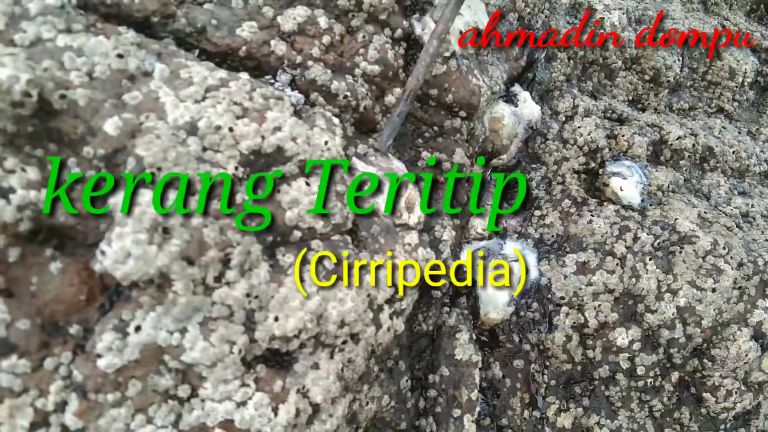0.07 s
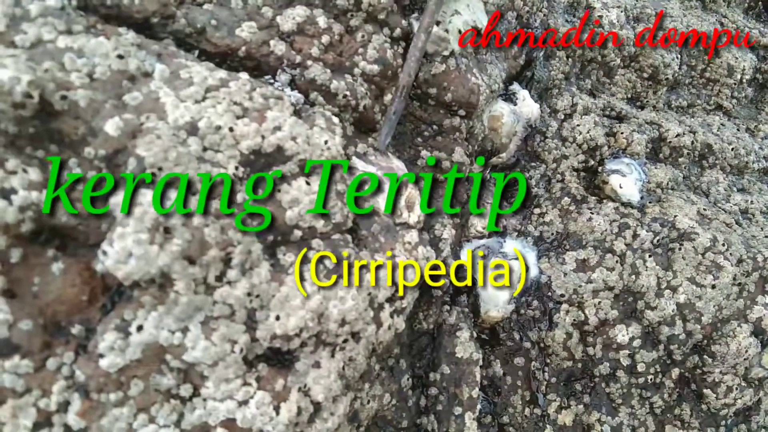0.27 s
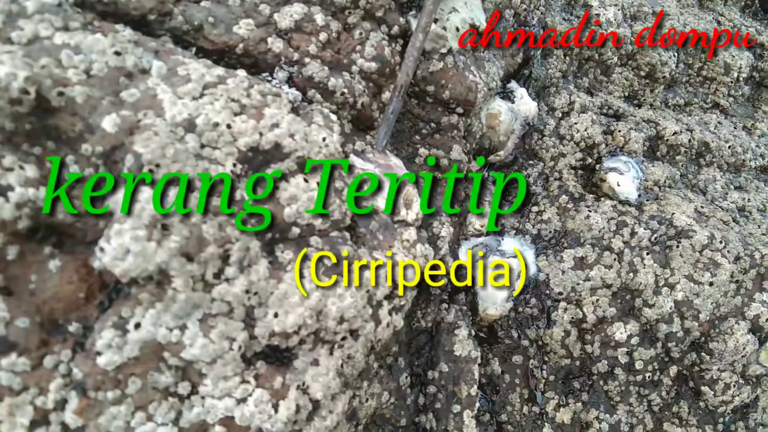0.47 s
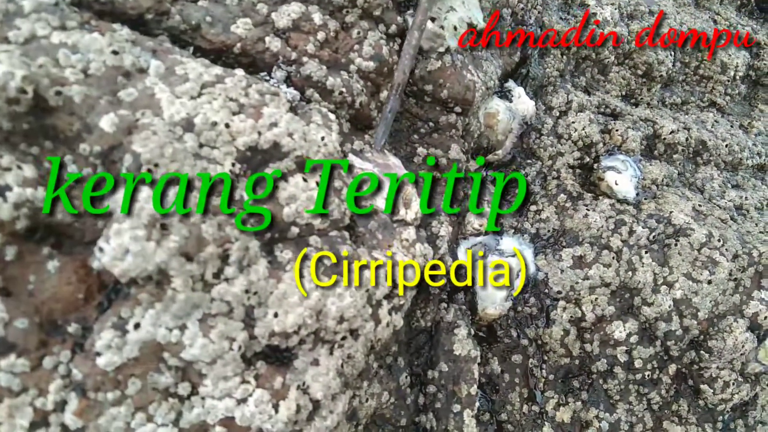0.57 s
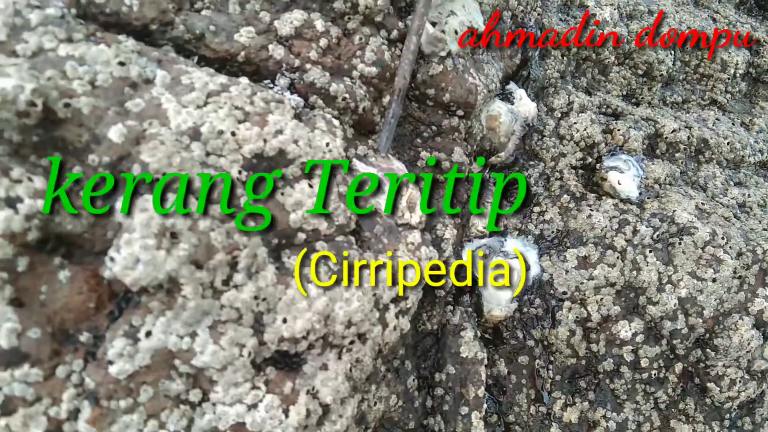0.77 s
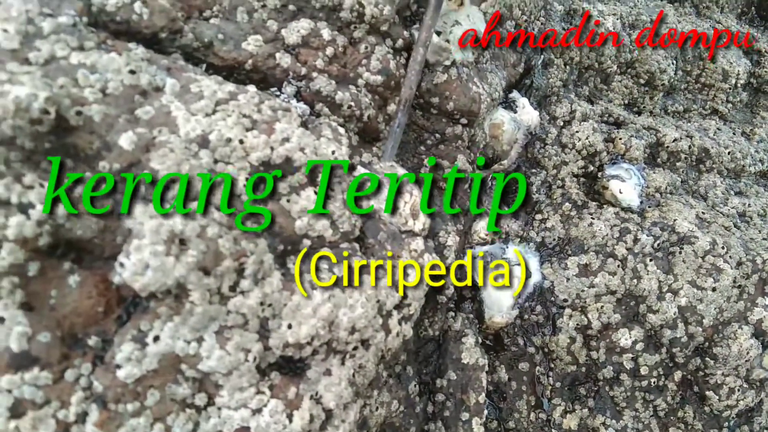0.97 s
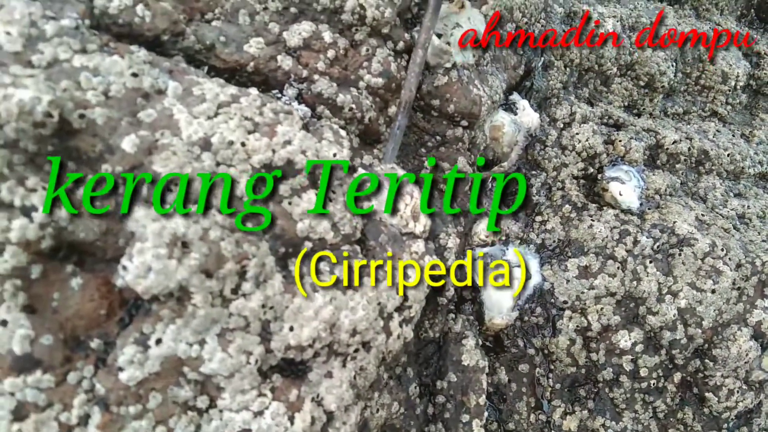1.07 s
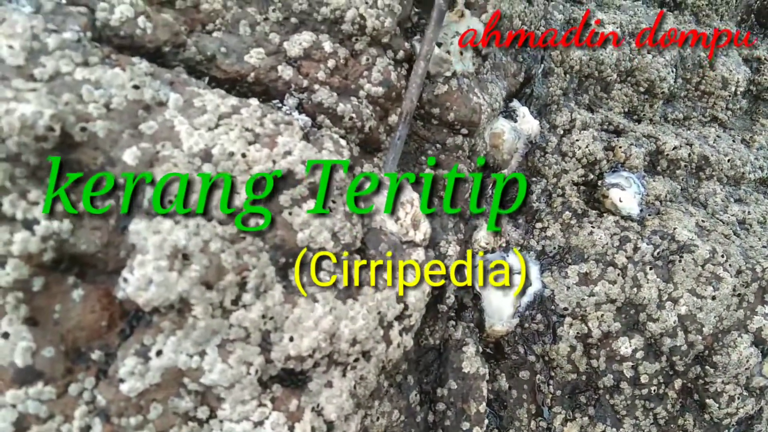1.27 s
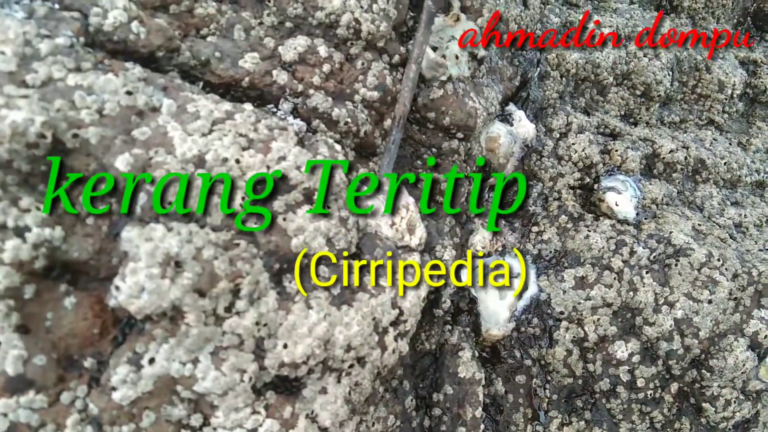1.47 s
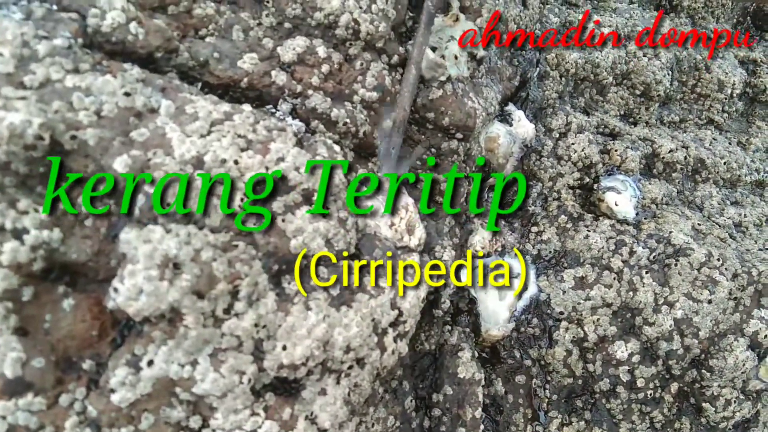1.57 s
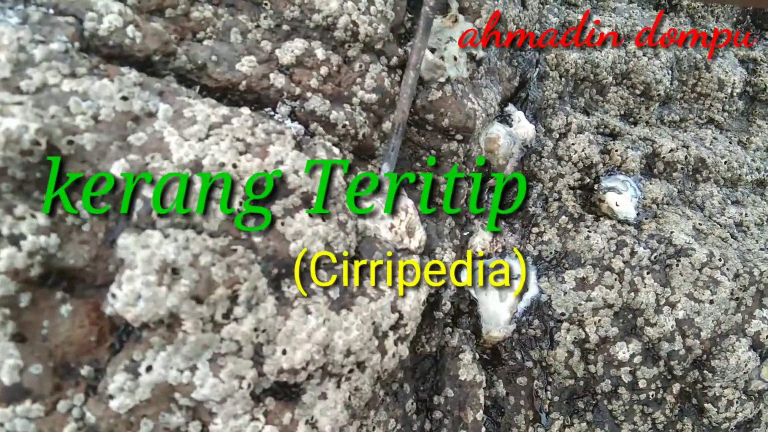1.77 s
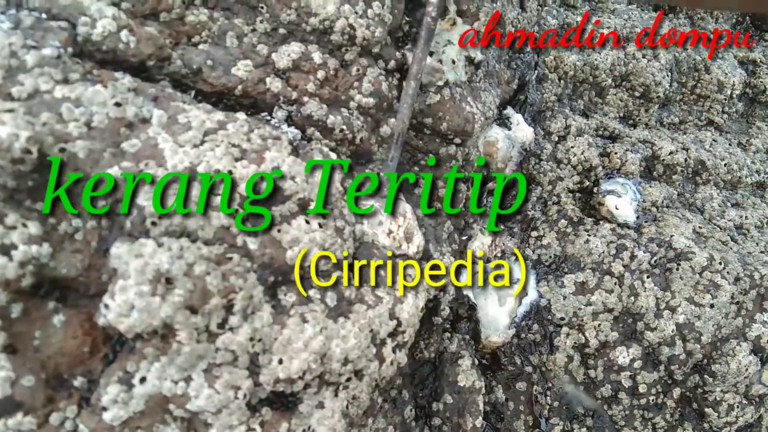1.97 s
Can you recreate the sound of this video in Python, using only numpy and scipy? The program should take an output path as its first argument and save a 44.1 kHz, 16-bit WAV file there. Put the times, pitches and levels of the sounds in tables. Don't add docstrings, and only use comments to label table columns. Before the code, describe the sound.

Six crisp chipping blows of a steel tool crushing shell on seashore rock, crumbs ticking afterwards

```python
import sys
import numpy as np
from scipy import signal
from scipy.io import wavfile

SR = 44100
rng = np.random.default_rng(int(sys.argv[2]) if len(sys.argv) > 2 else 0)


def ratio(d):
    e = np.asarray(d, float) / 20
    return 10 ** e


def store_wav(level_fs):
    pcm = np.round(np.clip(np.atleast_2d(level_fs), -1, 1) * 32767)
    wavfile.write(sys.argv[1], SR, pcm.T.astype(np.int16))


N = 89258


def at_hz(points, hz):
    table_hz, table_db = np.transpose(points)
    return np.interp(np.log(hz), np.log(table_hz), table_db)


def rms_one(x):
    return x / np.sqrt(np.mean(x ** 2) + 1e-20)


def drift(rate_hz):
    r = np.exp(-16 * np.pi * rate_hz / SR)
    noise = rng.standard_normal(N // 8 + 1502)
    slow = signal.lfilter([1], [1, -2 * r, r * r], noise)[1500:]
    return np.interp(np.arange(N) / 8, np.arange(len(slow)), rms_one(slow))


def ring(clicks, hz, t60):
    r, w = ratio(-60 / (t60 * SR)), 2 * np.pi * hz / SR
    return signal.lfilter([0, np.sin(w)], [1, -2 * r * np.cos(w), r * r], clicks + 1e-18)


def bands(sources, spectrum, patchy_db, rate_hz):
    out, power = 0, 0
    together = drift(rate_hz / 4)
    lowest, highest = spectrum[0][0], spectrum[-1][0]
    edges = lowest * 2 ** np.arange(-1 / 3, np.log2(highest / lowest) + 0.2, 1 / 3)
    for k, (low, high) in enumerate(zip(edges, np.minimum(edges[1:], 19000))):
        sos = signal.butter(2, [low, high], "band", fs=SR, output="sos")
        band = signal.sosfilt(sos, sources[k % 2])
        db = at_hz(spectrum, np.sqrt(low * high))
        flicker_db = patchy_db * (0.76 * together + drift(rate_hz))
        out = out + band * ratio(db + flicker_db)
        power += ratio(db) ** 2 * (high - low) / (SR / 2)
    return out / np.sqrt(power)


# frequency in Hz, level in dB per Hz.
SURF_COLOUR = [(300, -0.5), (800, -1), (1720, -5.5), (4090, -6.5), (5700, -13), (7300, -8), (11300, -40),
               (14800, -25.5), (16000, -34)]
# frequency in Hz, width in Hz, gain as a ratio.
PORT_RESONANCES = [(4170, 460, 0.72), (7340, 1140, 1), (14300, 2200, 0.65)]


def surf():
    hiss = bands(rng.standard_normal((2, N)), SURF_COLOUR, patchy_db=1.77, rate_hz=14)
    for hz, width, gain in PORT_RESONANCES:
        hiss = hiss + gain * signal.lfilter(*signal.iirpeak(hz, hz / width, fs=SR), hiss)
    return ratio(-31) * rms_one(hiss)


# time in seconds, level in dB.
GUSTS = [(0, -31), (.2, -36.5), (.45, -31), (.7, -30.5), (.9, -32), (1.15, -33.5), (1.27, -27.5),
         (1.36, -32.5), (1.5, -29.5), (1.66, -35), (1.8, -26.5), (1.93, -28), (2.02, -31)]
# frequency in Hz, level in dB per Hz.
WIND_COLOUR = [(25, -2), (50, -1.5), (91, -1.5), (160, -4.5), (340, -12), (520, -21)]


def wind():
    s, db = np.transpose(GUSTS)
    flutter = rms_one(bands(rng.standard_normal((2, N)), WIND_COLOUR, patchy_db=1.5, rate_hz=25))
    return ratio(np.interp(np.arange(N) / SR, s, db)) * flutter


def recorder_gain():
    floor_db, share, duck_s, recover_db_per_s = -22, 0.65, 0.0054, 8.5
    times, levels = [0.0], [0.0]
    for s, *_ in STABS:
        before = min(levels[-1] + recover_db_per_s * (s - times[-1]), 0)
        times += [s, s + duck_s]
        levels += [before, before + share * (floor_db - before)]
    levels.append(levels[-1] + recover_db_per_s * (N / SR - times[-1]))
    times.append(N / SR)
    return ratio(np.interp(np.arange(N) / SR, times, levels))


# centre in seconds, peak in dB, pitch in Hz, length in ms.
WIND_POPS = [(.098, -20, 197, 13.8), (.172, -26, 89, 24), (.232, -26, 99, 20), (0.332, -23.5, 138, 19),
             (1.255, -37, 148, 20), (1.285, -36, 130, 18), (1.408, -39, 110, 30), (1.771, -33.5, 200, 12.5),
             (1.813, -26.5, 246, 10), (1.835, -31.5, 200, 9), (1.865, -37, 150, 16),
             (1.893, -36.5, 150, 16)]


def pops():
    t, out = np.arange(N) / SR, np.zeros(N)
    for s, db, hz, ms in WIND_POPS:
        swell = np.exp(-((t - s) / ms * 3000) ** 2)
        out += ratio(db) * swell * np.sin(2 * np.pi * hz * (t - s))
    return out


# start in seconds, level in
# dB, pitch in Hz, length in ms.
FALLING_CRUMBS = [(.155, -43, 12500, 12), (.224, -25, 3260, 19), (.246, -25, 3740, 7.6),
                  (.279, -28.5, 3900, 8), (.5852, -54, 11000, 2.6), (.7565, -36, 7000, 7.5),
                  (.842, -43, 4150, 7.6), (0.887, -45, 8400, 3), (.9114, -54, 4800, 6.6),
                  (0.9771, -20, 3880, 8), (0.9778, -23.5, 6800, 6.7), (1.264, -45, 3500, 9.7),
                  (1.3098, -17, 7200, 5.7), (1.316, -26, 7500, 4.6), (1.3391, -30.5, 3470, 3.6),
                  (1.3393, -32.5, 5840, 4.9), (1.343, -33, 5000, 3), (1.504, -52, 3850, 6),
                  (1.648, -41, 4500, 12), (1.762, -47, 3940, 8.6), (1.8762, -45, 5730, 6),
                  (1.914, -43, 3500, 18), (1.951, -35, 4200, 4)]


def crumbs():
    out, t = np.zeros(N), np.arange(2048) / SR
    width = 1.107
    for s, db, hz, ms in FALLING_CRUMBS:
        edges = [hz / width, min(hz * width, 16000)]
        sos = signal.butter(2, edges, "band", fs=SR, output="sos")
        tick = rms_one(signal.sosfilt(sos, rng.standard_normal(2048)))
        age = t / (ms / 6000)
        tick = ratio(db) * tick * age * np.exp(1 - age)
        start = int(s * SR)
        out[start:start + 2048] += tick[:N - start]
    return out


# start in seconds, peak in dB, length in ms.
AIR_PUFFS = [
    (0.3784, -14, 5.4),
    (.681, -10.5, 5.7),
    (0.9681, -9, 3.75),
    (1.3069, -15.5, 7.3),
    (1.626, -48, 2.1),
    (1.9385, -23.5, 4.8),
]
# start in seconds, peak in dB, pitch in Hz, t60 in ms.
ROCK_KNOCKS = [(.3797, -5.5, 1460, 7.4), (.3795, -13.5, 357, 15), (1.6245, -9, 3300, 14),
               (.6825, -6.5, 815, 13.6), (.6805, -12.5, 1650, 8), (.969, -9, 408, 8.3),
               (.9672, -10, 2670, 7), (1.3065, -6.5, 800, 9.2), (1.307, -9, 1500, 6),
               (1.6255, -5, 530, 7.8), (1.625, -12.5, 1630, 12), (1.9382, -5, 1750, 11.3),
               (1.9385, -10, 690, 9.9), (1.938, -7.5, 2350, 9.7)]


def thumps():
    t, out = np.arange(N) / SR, np.zeros(N)
    for s, db, ms in AIR_PUFFS:
        out += ratio(db) * np.sin(np.pi * np.clip((t - s) / ms * 1000, 0, 1)) ** 2
    for s, db, hz, ms in ROCK_KNOCKS:
        click = np.zeros(N)
        click[int(s * SR)] = ratio(db)
        out += signal.lfilter([0.25], [1, -0.75], ring(click, hz, ms / 1000))
    return out


# start in seconds, crack level in dB, crush length in ms,
# debris level in dB.
STABS = [
    (0.3774, -10, 5.25, -21),
    (0.6793, -10.5, 4.9, -20),
    (0.967, -11, 3.2, -25.5),
    (1.3057, -9.5, 2.64, -22),
    (1.6241, -11, 3.66, -21),
    (1.9371, -10, 3.15, -21),
]
# frequency in Hz, level in dB per Hz.
SHELL_COLOUR = [(1300, -19.5), (2000, -6), (2900, -4.5), (4150, -0.5), (5600, -6.5), (7100, 3),
                (11500, -29), (14600, -20.5), (16000, -28)]
# frequency in Hz, level in dB per Hz.
DEBRIS_COLOUR = [(710, -43), (1200, -13), (3360, -11.5), (4360, -1), (5780, -10), (7100, 1), (11200, -35),
                 (14700, -12), (16000, -40)]
# frequency in Hz, level in dB, t60 in seconds.
SHAFT_RINGS = [(2790, -14, 0.015), (3230, -13.5, 0.0055), (4300, -9.5, 0.016), (4950, -14, 0.009),
               (7000, -1, 0.029), (7830, -8, 0.02), (8900, -33, 0.0094), (14300, -14, .008)]


def cracking():
    cracks_per_s, spread_db, rise_s = 12000, 2.5, 0.00015
    break_t60_s, debris_t60_s = 0.0068, 0.043
    t, crush, rattle = np.arange(N) / SR, np.zeros(N), np.zeros(N)
    for s, db, ms, debris_db in STABS:
        age = np.maximum(t - s, 0)
        late = np.maximum(age - ms / 1000, 0)
        rise = np.clip(age / rise_s, 0, 1)
        first_db = 7 * np.exp(-age / 0.00077)
        crush += rise * ratio(db + first_db - 60 * late / break_t60_s)
        rattle += rise * ratio(debris_db - 60 * late / debris_t60_s)
    rattle = rattle * ratio(1.0 * drift(180))

    sizes = ratio(spread_db * np.minimum(rng.exponential(1, (2, N)), 4))
    sizes = sizes * rng.choice([-1, 1], (2, N))
    cracks = rms_one(sizes * (rng.random((2, N)) < cracks_per_s / SR))
    shell = bands(cracks * crush, SHELL_COLOUR, patchy_db=0.83, rate_hz=160)
    debris = bands(cracks * rattle, DEBRIS_COLOUR, patchy_db=2, rate_hz=240)
    shaft = np.zeros(N)
    for k, (hz, db, t60) in enumerate(SHAFT_RINGS):
        shaft += ratio(db - 17) * ring(cracks[k % 2] * (crush + rattle), hz, t60)
    return shell + debris + 0.31 * shaft


def scene():
    shore = recorder_gain() * (surf() + wind())
    return (shore + pops() + crumbs() + thumps() + cracking())[None]


def low_pass(x):
    return signal.sosfilt(signal.butter(12, 16520, fs=SR, output="sos"), x)


def record(dry):
    w, q = 2 * np.pi * 74.7, 1.225
    x = signal.lfilter(*signal.bilinear([1, 0, 0], [1, w / q, w * w], SR), dry)
    x = signal.lfilter(*signal.butter(1, 22, "high", fs=SR), x)
    ceiling, hardness = 0.8, 2.87
    x = x / (1 + np.abs(x / ceiling) ** hardness) ** (1 / hardness)
    x = signal.sosfilt(signal.cheby2(6, 22, 16100, fs=SR, output="sos"), x)
    return low_pass(x)


dry = scene()
out = record(dry)
store_wav(out)
```